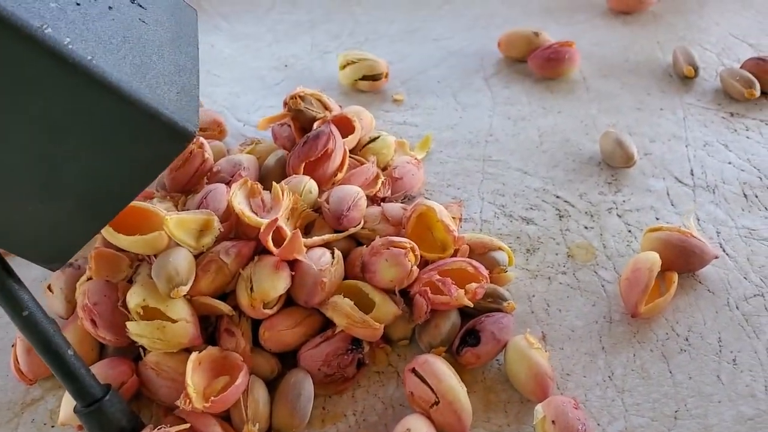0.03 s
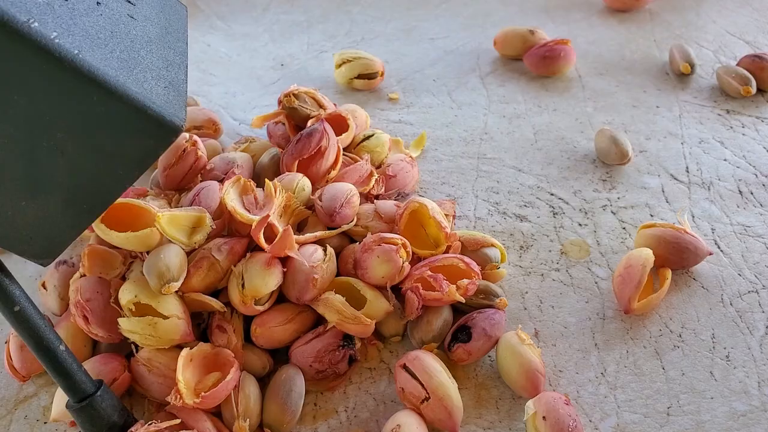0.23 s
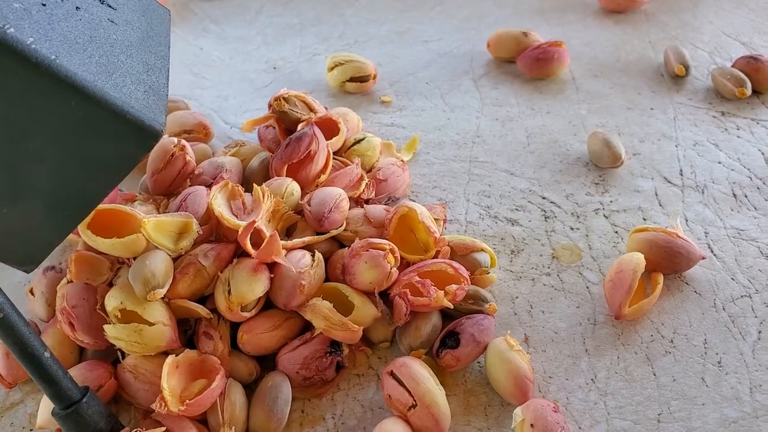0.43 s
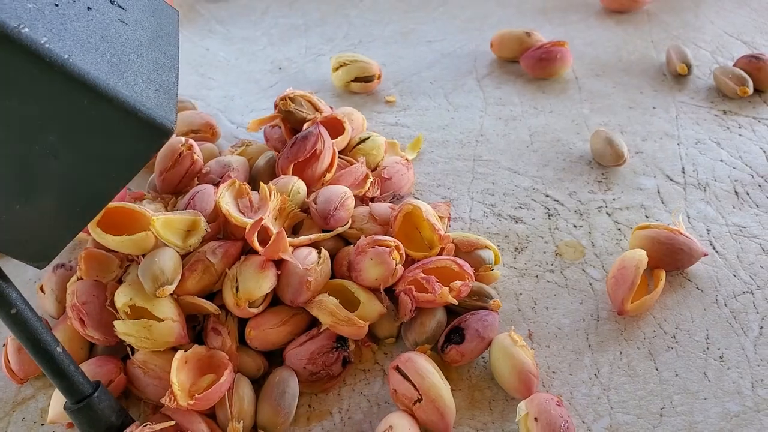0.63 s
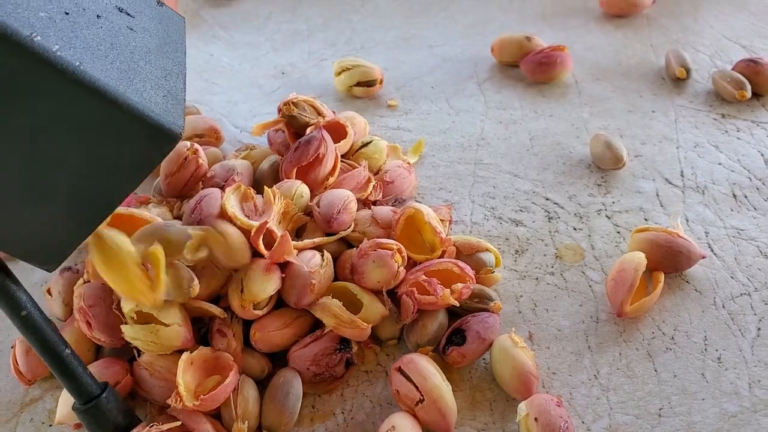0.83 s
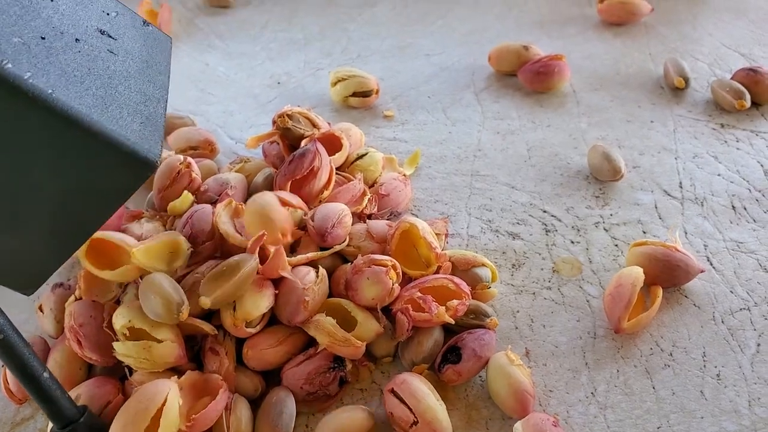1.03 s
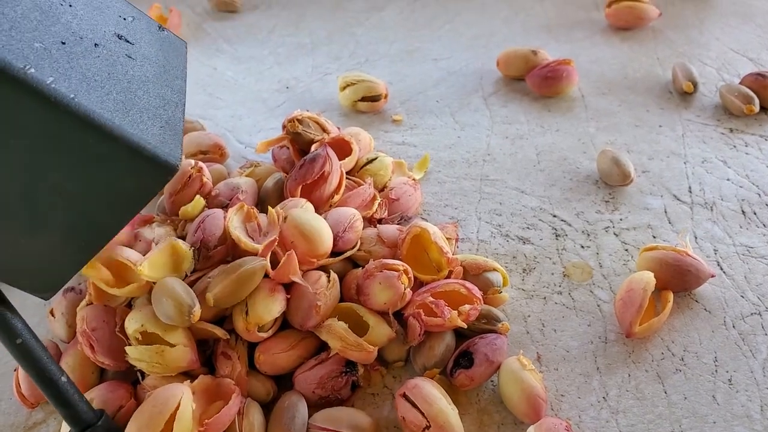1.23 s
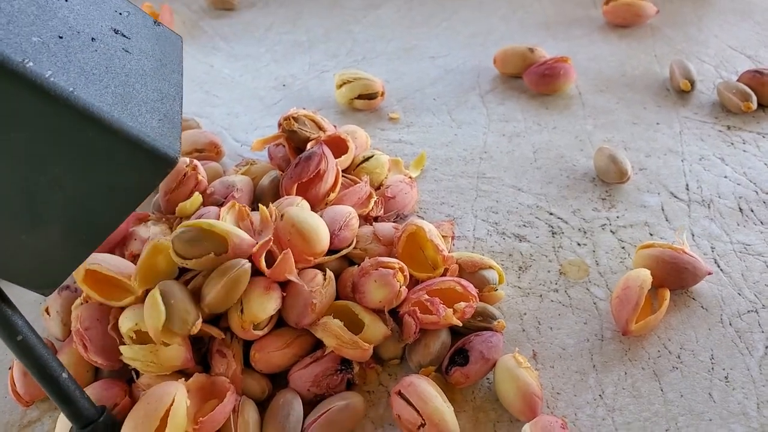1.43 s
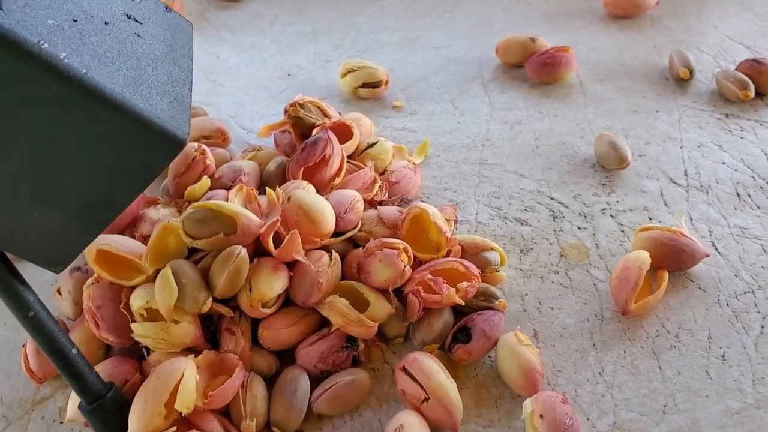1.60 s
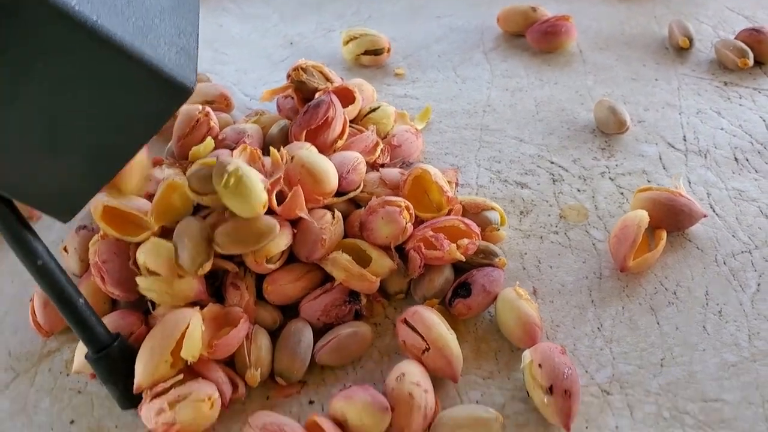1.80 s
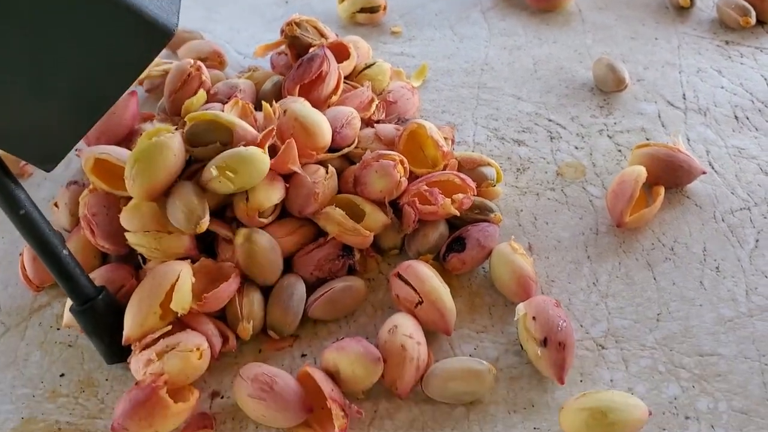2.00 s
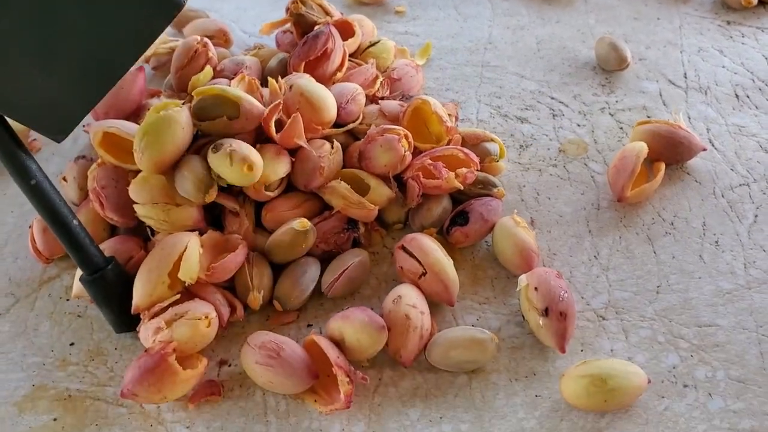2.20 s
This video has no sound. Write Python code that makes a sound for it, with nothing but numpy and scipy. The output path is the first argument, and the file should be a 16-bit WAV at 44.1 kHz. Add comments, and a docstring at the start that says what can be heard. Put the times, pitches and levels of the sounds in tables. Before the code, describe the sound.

Close by, nuts rattle unevenly inside a metal hulling machine, making it thud and ring briefly. The knocks ease as husks scrape and shells drop onto a heap, then pick up again while the mechanism rumbles softly.

```python
"""A hand-worked hulling machine drops pistachios onto a pile, close by.
From the start the turning mechanism rumbles low and the hulls rustle as they rub together.
Nuts begin to knock about in the hollow metal housing, which thuds and rings.
Around one second in, the knocks ease while husks scrape and shells land on the pile with dry ticks.
A second run of knocks follows, and a last weak one comes just before the end."""
import sys
import numpy as np
from scipy import signal
from scipy.fft import rfft, irfft
from scipy.io import wavfile
from scipy.ndimage import uniform_filter1d

SR = 44100
rng = np.random.default_rng(int(sys.argv[2]) if len(sys.argv) > 2 else 0)


def to_wav(sig):
    """Store sig (one row per channel, or 1-D mono) as 16-bit WAV at the path in sys.argv[1].

    Samples outside -1..1 are clipped; the rate is SR.
    """
    pcm = np.clip(np.atleast_2d(sig), -1, 1) * 32767
    pcm = np.round(pcm).astype(np.int16)
    wavfile.write(sys.argv[1], SR, pcm.T)  # frames by channels


N = 103635

# The housing's modes, the tones it rings at. t60 is the time to fade by 60 dB; pan is left minus right.
# f/Hz, level/dB, t60/s, pan/dB, phase lead of the left side/rad
HOUSING_MODES = [(120.6, -15, 0.28, 1, -0.66), (184, -9, 0.26, 0, -0.94), (264.9, -9, 0.29, -2.5, -0.62),
                 (584.7, -9.5, 0.28, 1.5, 0.1), (749, -7, 0.27, -0.5, 1.77), (797, -7, 0.073, 9, 2.25),
                 (978, -11.5, 0.34, 9, 2.5), (1084, -6, 0.17, 7, 1.1), (1592, -18.5, 0.39, -5, 3.4),
                 (1800, -15, 0.31, 3, 2.5), (2167, -7.5, 0.13, -3, 2.2), (2290, -9, 0.13, -1.5, -0.75),
                 (2354, -7.5, 0.093, 0, 2), (2665, -12.5, 0.11, -3, 0.2), (2970, -21, 0.26, -7.5, -2.4),
                 (3050, -11.5, 0.063, -8, 0.5), (3390, -22, 0.066, -7, 0), (3428, -11.5, 0.16, -8.5, 1.27),
                 (3612, -16, 0.13, -11, 1.5), (4790, -14, 0.1, -18.5, 9.5), (5247, -11.5, 0.071, 10, -0.5)]


def knocks(size=24576):
    """Nuts hit the metal housing: each hit sets off a clatter, ringing tones and a low thud."""
    # One row a hit: t/s, thud/dB, body/dB, ring/dB, crack/dB, pan/dB, thud f/Hz, favoured f/Hz
    hits = [(.085, -31, -63, -53.5, -60, -1, 310, 2300), (.212, -22.5, -32, -25.5, -41, -0.5, 264, 1082),
            (.226, -22, -28.5, -25, -36.5, 1, 319, 3000), (0.257, -28.5, -39, -56, -60, 0, 266, 744),
            (0.39, -18.5, -30.5, -29, -48, -2, 213, 1300), (.409, -26, -28, -12.5, -32, 2, 266, 2135),
            (0.419, -23, -29, -20.5, -13, 1, 184, 2664), (.438, -21, -40, -19, -58, -1, 266, 2300),
            (.521, -23, -29, -28, -55, 1, 184, 2400), (0.529, -27, -24.5, -24.5, -42, 2.5, 266, 2664),
            (0.5604, -18.5, -36, -20, -31, 1.5, 184, 3480), (0.579, -22.5, -30.5, -30, -55, -1, 266, 795),
            (.662, -43, -33.5, -26.5, -81, 4.5, 266, 2664), (0.69, -23.5, -29, -17, -28.5, 0.5, 266, 2970),
            (0.786, -23.5, -22, -12, -28, 1, 184, 2664), (0.836, -31.5, -56, -25.5, -71, 3, 184, 2300),
            (0.894, -34, -57, -63, -42, -3, 266, 578), (.968, -32.5, -40.5, -41.5, -39.5, 2, 120, 2300),
            (1.055, -25.5, -38, -60, -50, 1.5, 266, 744), (1.125, -20, -29, -37.5, -47, 2, 120, 1200),
            (1.166, -55, -31, -29.5, -52, -3.5, 120, 2300),
            (1.373, -14.5, -23.5, -36.5, -36.5, -2.5, 246.3, 1026),
            (1.399, -20, -27.5, -52, -55, 2, 266, 744), (1.505, -25.5, -37, -34.5, -48, 1, 184, 578),
            (1.554, -23.5, -33.5, -18, -34.5, 2, 166, 2300),
            (1.571, -21, -37.5, -46, -47, -2.5, 193.5, 1082), (1.591, -23.5, -35, -37, -50, 2, 228, 2540),
            (1.7621, -21.5, -25.5, -14.5, -16.5, -1, 266, 3080),
            (1.808, -17, -31, -26, -44, -0.5, 214, 3420), (1.824, -21.5, -30, -27.5, -41.5, -0.5, 255, 578),
            (1.871, -24.5, -30.5, -40, -54, 2, 203, 2300), (1.922, -22.5, -48, -44.5, -42, 3.5, 148, 578),
            (2.019, -27.5, -46, -32, -63, 0, 266, 1082), (2.029, -28, -30.5, -19.5, -24.5, 2, 266, 2970),
            (2.077, -31, -35.5, -48, -54, 3, 184, 3420), (2.278, -35, -35.5, -29.5, -59, 2, 266, 2400)]
    # Centres of the thud, body, ring and crack ranges: f/Hz
    ranges_hz = [230, 850, 2700, 9000]
    thud_db, thud_t60_s = 3, 0.14
    hard_db, soft_rise_s = -23, 0.0026  # weaker hits are glancing and swell more slowly
    out, t = np.zeros((2, N)), np.arange(size) / SR
    log_f = np.log(np.fft.rfftfreq(size, 1 / SR) + 1)
    # The upper overtones bunch together in the same way in every knock.
    ripple = undb(4.5 * wander(len(log_f), size=40) * (log_f > np.log(ranges_hz[1])))
    for start, *levels_db, pan_db, thud_hz, favoured_hz in hits:
        force = lambda hz: undb(np.interp(np.log(hz), np.log(ranges_hz), levels_db))
        sound = clatter(t, log_f, force, ripple) + ringing(t, force, favoured_hz)
        thud = fade(t, thud_t60_s) * (1 - np.exp(-t * thud_hz)) * np.sin(2 * np.pi * thud_hz * t)
        sound += force(thud_hz) * undb(thud_db) * thud
        softness = np.clip((hard_db - max(levels_db)) / 10, .001, 1)
        add(out, start, sound * pan(pan_db) * swell(t, softness * soft_rise_s))
    return out


def ringing(t, force, favoured_hz):
    """The struck housing rings at its modes; the spot that is hit favours those near one pitch."""
    twins_above_hz, twin_split = 2000, 0.012  # the split is a share of the frequency
    sound = np.zeros((2, len(t)))
    for hz, db, t60, pan_db, lead in HOUSING_MODES:
        phase, twin_phase = np.exp(2j * np.pi * rng.random(2))
        if hz > twins_above_hz:  # high modes come in close pairs, which throb against each other
            beat = np.exp(1j * np.pi * twin_split * hz * t)
            phase = (phase * beat.conj() + twin_phase * beat / 2) / np.sqrt(1 + .5 ** 2)
        tone = (phase * np.exp(1j * (2 * np.pi * hz * t + np.array([[lead], [0]])))).imag
        favour_db = 10 * np.exp(-(np.log(hz / favoured_hz) / 0.04) ** 2)
        scatter_db = 2 * rng.standard_normal()
        gain = np.sqrt(2) * force(hz) * undb(db - 0.5 + favour_db + scatter_db)
        sound += gain * pan(pan_db) * swell(t, rise_s=0.0015) * fade(t, t60) * tone
    return sound


def clatter(t, log_f, force, ripple):
    """The housing's overtones lie so close together that they sound like bands of fading noise."""
    # Bands of overtones: f/Hz, level/dB, t60/s, pan/dB, likeness of left and right (0-1)
    bands = [(75.6, -24, 0.16, 6, 1), (133, -12.5, 0.14, -1.5, 1), (249, -9, 0.18, 1.5, 1),
             (500, -9, 0.19, 0, 0.4), (1084, -6.5, 0.2, 1.5, 0.05), (1670, -14.5, 0.17, 14.5, 0),
             (2630, -8.5, 0.16, -5, 0.1), (4000, -10, 0.11, -6, 0), (6100, -8, 0.072, -2, 0),
             (8760, -3, 0.046, -3, 0.81), (15900, -12.5, 0.031, 4, 0.4)]
    centres = np.log([row[0] for row in bands])
    low_cut = np.minimum(np.exp(log_f - centres[0]), 1) ** 4
    room_echo = undb(-29) * fade(t, t60=0.55)
    sound, strike = np.zeros((2, len(t))), chatter(t)
    for (hz, db, t60, pan_db, likeness), this_band in zip(bands, np.eye(len(bands))):
        spectrum = np.sqrt(np.interp(log_f, centres, this_band) * low_cut) * ripple
        envelope = swell(t, rise_s=0.0006 + .5 / hz) * (strike + fade(t, t60) + room_echo)
        sound += force(hz) * undb(db + 0.5) * pan(pan_db) * envelope * stereo(noise(spectrum), likeness)
    return sound


def chatter(t, count=5):
    """Loudness over time as a nut strikes and then bounces unevenly, weaker each time."""
    strike_db, decay_s, mean_gap_s, step_db = -6, 0.0039, 0.0069, -4.5
    gaps = mean_gap_s * (.5 + rng.random(count))
    starts = np.cumsum(gaps) - gaps[0]
    return sum(undb(strike_db + k * step_db) * (t >= start) * np.exp(-abs(t - start) / decay_s)
               for k, start in enumerate(starts))


def shell_ticks(size=4096):
    """A dry shell meets the pile: a snap of a few milliseconds and a faint tail."""
    # Shells landing: t/s, level/dB, strongest f/Hz, pan/dB
    landings = [(.4945, -37, 13000, 9), (0.915, -23, 2980, -2.5), (0.925, -23, 11500, -4),
                (1.028, -39, 8200, -5), (1.134, -30, 1880, -7), (1.1762, -18.5, 3000, -6),
                (1.178, -23, 11600, -3), (1.196, -27, 1930, 8), (1.232, -37, 1700, -2),
                (1.257, -30, 1950, 0), (1.274, -29, 890, -2),  (1.372, -15.5, 12500, -8),
                (1.4313, -33.5, 13000, -1), (1.9254, -27, 11900, -1)]
    snap_s, tail_db, tail_s = 0.00088, -18.5, 0.015
    out, t, f = np.zeros((2, N)), np.arange(size) / SR, np.fft.rfftfreq(size, 1 / SR) + 1
    envelope = np.exp(-t / snap_s) + undb(tail_db) * np.exp(-t / tail_s)
    for start, db, hz, pan_db in landings:
        snap = stereo(noise(resonance(f, hz, octaves=0.27)), likeness=0.2)
        add(out, start, undb(db) * pan(pan_db) * envelope * snap)
    return out


def scrapes(t, slips_per_s=1600):
    """Nuts and husks drag over one another: short runs of tiny slips through a broad resonance."""
    # Drags: t/s, length/s, level/dB, strongest f/Hz
    drags = [(0.547, 0.032, -26, 810), (1.099, 0.051, -23.5, 700), (1.107, 0.032, -44.5, 12600),
             (1.484, 0.042, -44, 12500), (1.651, 0.069, -53.5, 13600), (1.801, 0.045, -33, 3080)]
    out, f = np.zeros((2, N)), np.fft.rfftfreq(N, 1 / SR) + 1
    for start, length, db, hz in drags:
        slips = (rng.random((2, N)) < slips_per_s / SR) * rng.standard_normal((2, N))
        rub = irfft(rfft(stereo(slips, likeness=.5)) * resonance(f, hz, octaves=0.31), N)
        progress = np.clip((t - start) / length, 0, 1)
        out += undb(db) * unit(rub) * np.sqrt(abs(np.sin(np.pi * progress)))
    return out


def hull_rustle(t, clicks_per_s=4000, spread_db=2):
    """Hulls rub on one another: a crowd of tiny clicks."""
    # Loudness of the rustle: t/s, level/dB
    loudness = [(0, -53.5), (.35, -46), (.5, -36.5), (.65, -48), (.88, -40), (.97, -50.5), (1.0, -55.5),
                (1.15, -42.5), (1.33, -48), (1.52, -46.5), (1.63, -67), (1.74, -49), (1.92, -42.5),
                (2.0, -48.5), (2.35, -51.5)]
    # Tone colour of the rustle: f/Hz, level/dB
    spectrum = [(300, 19), (1200, 7.5), (2500, 11), (4500, -1), (6500, -6), (9000, -10), (12000, 3.5),
                (16000, -7)]
    clicks = (rng.random((2, N)) < clicks_per_s / SR) * rng.choice([-1, 1], (2, N))
    grains = clicks * undb(spread_db * np.minimum(rng.exponential(size=(2, N)), 4))
    rustle = unit(colour(stereo(grains, likeness=0.32), spectrum))
    return rustle * undb(along(loudness, t)) * pan(-1.6)


def mechanism(t, scrape_db=-14.5):
    """The turning mechanism rumbles unevenly, and its scraping keeps the housing faintly ringing."""
    # Loudness of the mechanism: t/s, level/dB
    loudness = [(0, -40.5), (.35, -42), (.7, -34.5), (1.3, -37.5), (1.55, -34.5), (1.72, -42.5), (1.9, -36),
                (2.1, -34.5), (2.25, -42), (2.35, -37.5)]
    # Tone colour of the rumble: f/Hz, level/dB
    spectrum = [(28, -38), (50, 5.5), (80, 2), (110, 6), (180, 1.5), (265, 6.5), (380, -10.5), (750, -17),
                (1150, -13.5), (1600, -43), (4000, -38)]
    waver_db = 1.5 * wander(N, size=2048)
    rumble = unit(colour(stereo(rng.standard_normal((2, N)), likeness=1), spectrum))
    f = np.fft.rfftfreq(2 * N, 1 / SR)
    mode_peaks = sum(undb(db) / np.sqrt(hz) / (1 + ((f - hz) * t60 / 4) ** 2)
                     for hz, db, t60, _, _ in HOUSING_MODES)
    ring = stereo(noise(mode_peaks)[:, :N], likeness=0.088)
    return (rumble + undb(scrape_db) * ring) * undb(along(loudness, t) + waver_db)


def undb(db):
    """Turn decibels into a factor to multiply by."""
    return 10 ** (np.asarray(db) / 20)


def unit(x):
    """Scale to an average strength (rms) of 1."""
    return x / np.sqrt(np.mean(x ** 2))


def pan(db):
    """Left and right gains that make the left side louder by db."""
    return undb(np.array([[db], [-db]]) / 2)


def along(rows, at):
    """Join (time, value) rows with straight lines."""
    return np.interp(at, *np.array(rows).T)


def colour(x, rows):
    """Turn frequencies up or down along rows of f/Hz, level/dB."""
    hz, db = np.array(rows).T
    f = np.fft.rfftfreq(x.shape[-1], 1 / SR)
    return irfft(rfft(x) * undb(np.interp(np.log(f + 1), np.log(hz), db)), x.shape[-1])


def resonance(f, hz, octaves):
    """A hump around hz that falls to half this many octaves to either side."""
    return 1 / (1 + (np.log2(f / hz) / octaves) ** 2)


def stereo(pair, likeness):
    """Mix two unrelated signals into left and right; likeness 1 makes the sides equal."""
    middle = np.sqrt(1 + likeness) * pair[0]
    side = np.sqrt(1 - likeness) * pair[1]
    return np.array([middle + side, middle - side]) / np.sqrt(2)


def noise(spectrum):
    """Two unrelated noises of rms 1 with the given spectrum."""
    return unit(irfft(spectrum * np.exp(2j * np.pi * rng.random((2, len(spectrum))))))


def wander(count, size):
    """A smooth random curve of rms 1 that changes over about size steps."""
    return unit(uniform_filter1d(uniform_filter1d(rng.standard_normal(count), size), size))


def swell(t, rise_s):
    """Rise from 0 towards 1, about two thirds of the way in rise_s seconds."""
    return 1 - np.exp(-t / rise_s)


def fade(t, t60):
    """Fall by 60 dB in t60 seconds."""
    return np.exp(-np.log(1000) * t / t60)


def add(out, start, sound):
    """Mix a sound in at start seconds."""
    i = max(int(start * SR), 0)
    out[:, i:i + sound.shape[1]] += sound[:, :max(N - i, 0)]


def scene():
    """Machine and pile together."""
    t = np.arange(N) / SR
    return knocks() + shell_ticks() + scrapes(t) + hull_rustle(t) + mechanism(t)


def record(dry, top_hz=16200):
    """Clip peaks at full scale and cut the highest treble."""
    low_pass = signal.ellip(8, .2, 70, top_hz, fs=SR, output="sos")
    return signal.sosfilt(low_pass, np.clip(dry, -1, 1))


dry = scene()
out = record(dry)
to_wav(out)
```